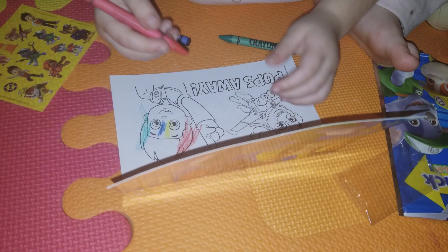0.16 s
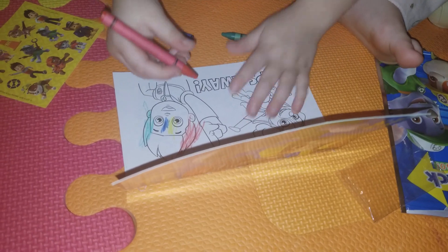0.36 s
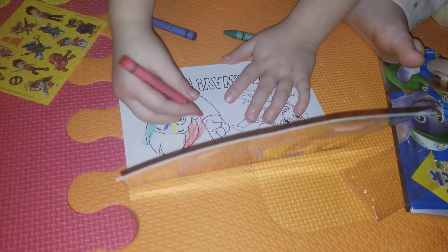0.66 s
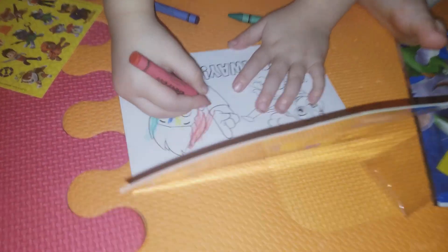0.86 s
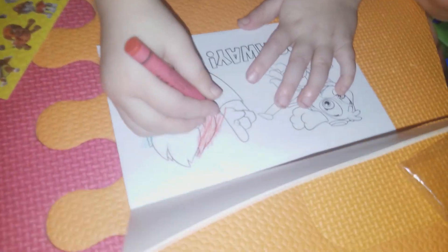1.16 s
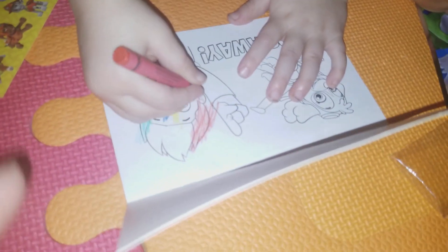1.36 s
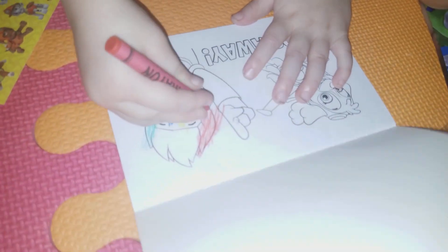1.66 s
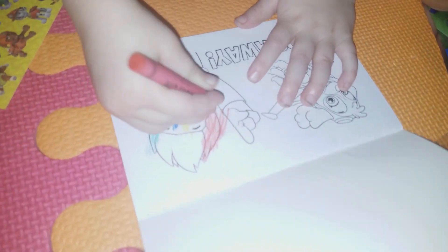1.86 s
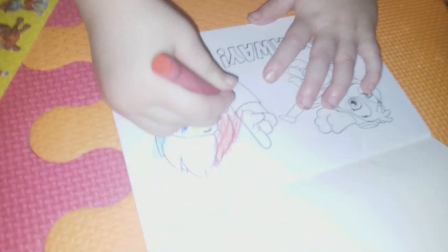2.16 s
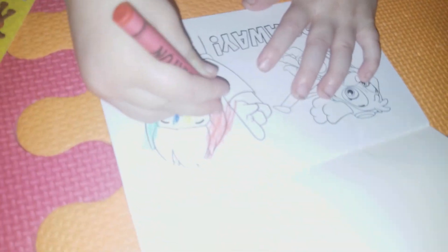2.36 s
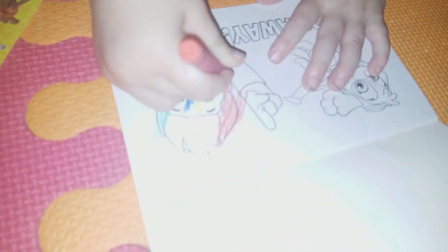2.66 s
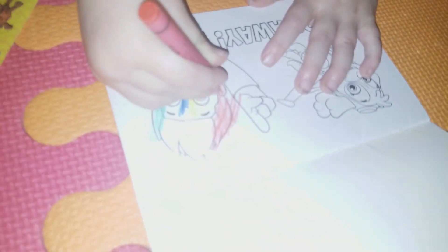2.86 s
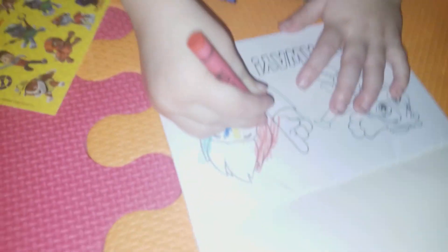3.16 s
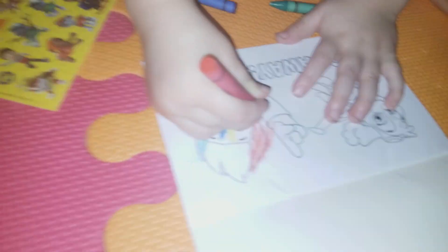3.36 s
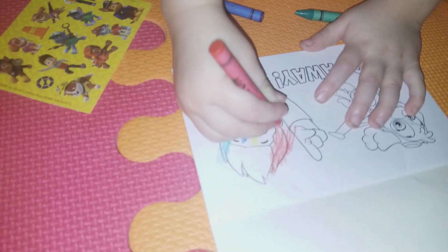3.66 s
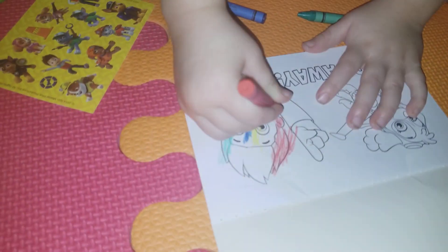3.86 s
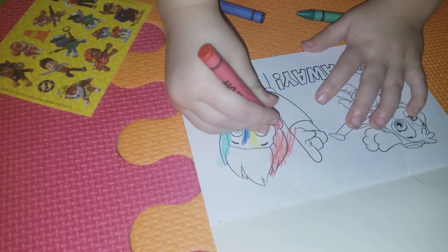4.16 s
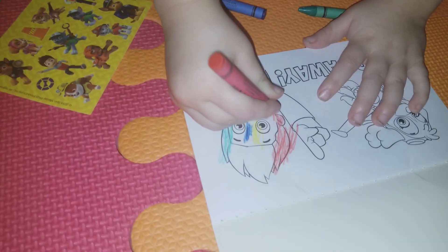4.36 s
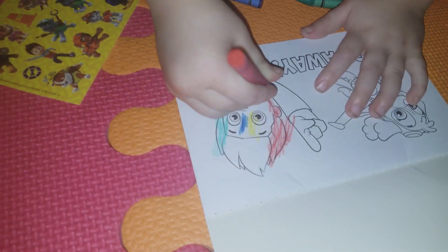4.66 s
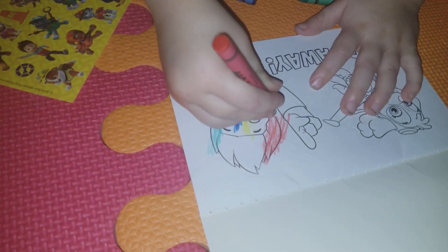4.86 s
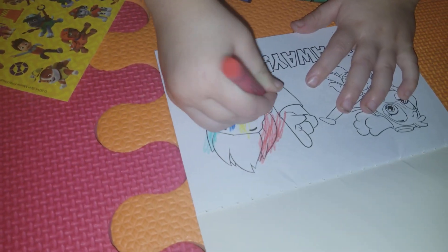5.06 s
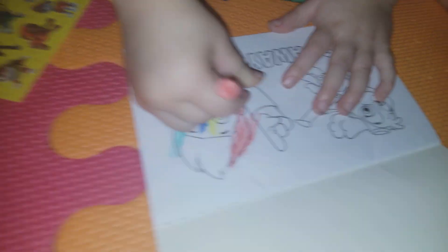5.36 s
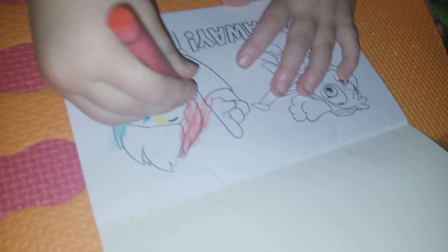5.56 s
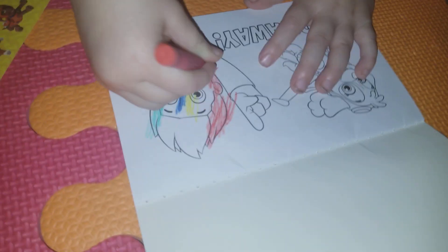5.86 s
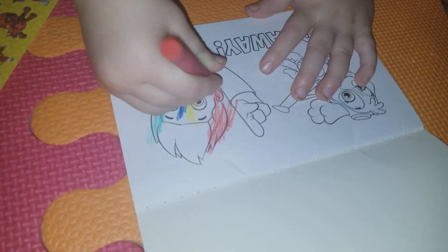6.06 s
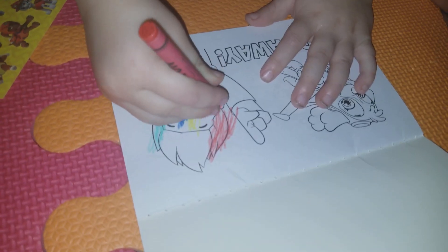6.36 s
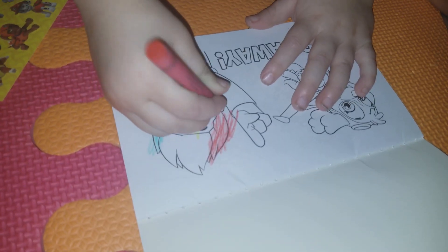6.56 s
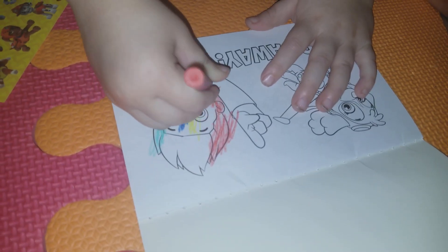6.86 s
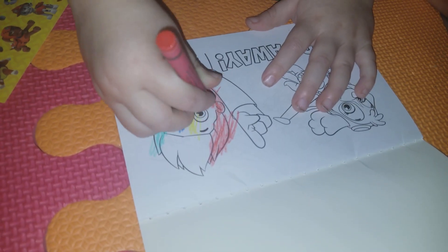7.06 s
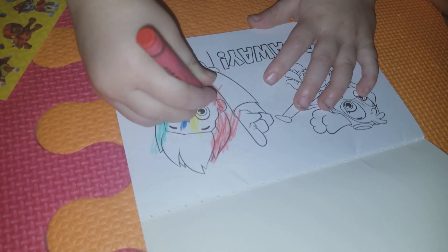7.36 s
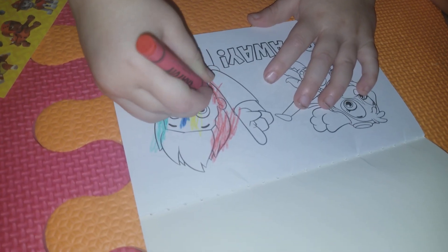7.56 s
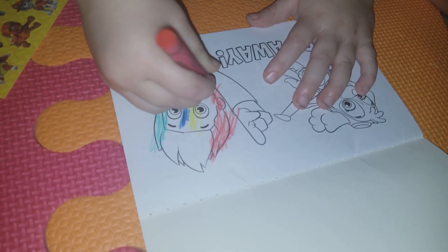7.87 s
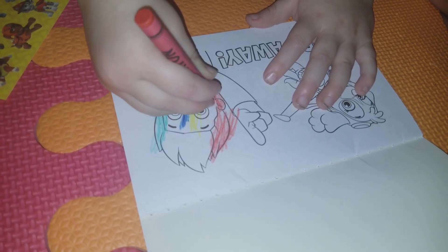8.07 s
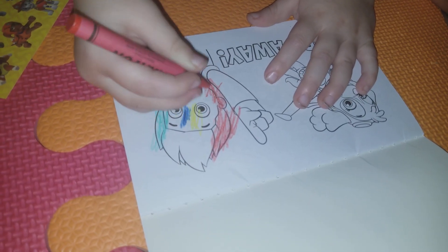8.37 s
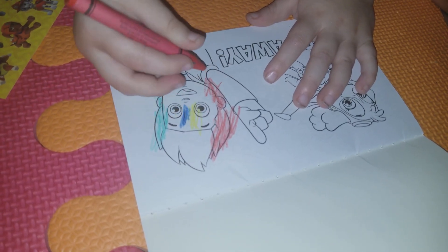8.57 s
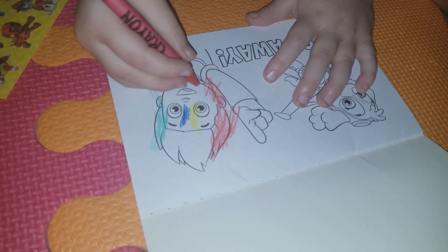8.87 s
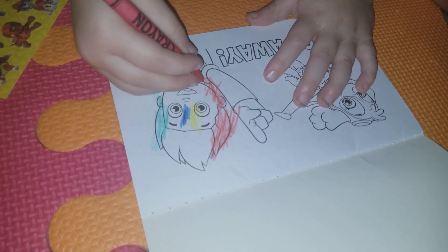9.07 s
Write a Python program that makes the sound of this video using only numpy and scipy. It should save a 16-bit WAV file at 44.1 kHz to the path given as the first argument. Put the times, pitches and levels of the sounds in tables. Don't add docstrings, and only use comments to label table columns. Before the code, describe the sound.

A quiet indoor room, heard very close on a handheld stereo microphone. A low, steady appliance hum and soft airy room noise run throughout, with a thin whine fading over the first two seconds. From 0 to 3.2 s a paper page flaps and rustles, shifting between the sides, with small ticks and dull handling knocks near 0.4, 1.0 and 1.6 s. At about 2.4 s the cover gives a crisp snap, followed at 2.5 s by the loudest hard clack with a low thump and a short fingertip scrape. More taps click around 3.1 to 3.3 s. Then a wax crayon rubs flat paper in short, soft, grainy hisses, mainly to the right, unevenly spaced. Light taps and knocks interrupt around 5.3 to 5.7 s. Strokes continue sparser after 6 s, with faint skin rubs near 7 s, ending in longer, fainter rubbing from 8.3 to 9.2 s.

```python
import sys
import numpy as np
from scipy import signal
from scipy.fft import rfft, irfft, next_fast_len
from scipy.io import wavfile
from scipy.ndimage import uniform_filter1d

SR = 44100
rng = np.random.default_rng(int(sys.argv[2]) if len(sys.argv) > 2 else 0)


def transcribe(signal):
    frames = np.atleast_2d(signal).T
    limited = np.clip(frames, -1, 1)
    pcm = np.round(limited * 32767).astype(np.int16)
    wavfile.write(sys.argv[1], SR, pcm)


def invert_db(x):
    u = np.asarray(x, float) / 20
    return 10 ** u


N = 407032
FAST = next_fast_len(N)
PORT_LAG, MAT_ECHO = 20, 34

# (start [s], length [s], hiss [dB], swell across the stroke [dB], extra sheen [dB])
STROKES = [(3.268, 0.076, -61, -2, 2), (3.48, 0.11, -63, -4, -2), (3.59, 0.083, -59.5, -3, 3),
           (3.669, .18, -60, 11, 1.3), (3.906, .14, -64, -8, 1.5), (4.088, 0.13, -58.5, 4, -2),
           (4.323, 0.23, -58.5, 12, -0.2), (4.661, 0.22, -57, 5.5, 3), (5.031, 0.16, -61, -2, 1.5),
           (5.22, .11, -54, -1, -3), (5.387, 0.15, -61, -5, 2), (5.546, 0.076, -57, -10, 2),
           (5.747, 0.22, -58.5, -7, -0.8), (6.047, .13, -57.5, -6, 0.3), (6.63, .18, -59.5, 0.1, 1.5),
           (6.976, 0.14, -60.5, -4, 2.5), (7.09, 0.099, -65, 0.1, 0.1), (7.599, 0.17, -60.5, 2, 0.5),
           (7.873, .1, -59, -8, 1), (7.956, 0.19, -65, -24, 0.1), (8.324, 0.29, -64, 5, 1.2),
           (8.557, 0.27, -67, 4, 0), (8.802, 0.55, -67.5, 13, -0.5)]
STROKE_ATTACK_S, STROKE_RELEASE_S = 0.083, 0.086
STROKE_BODY_DB, STROKE_GRIT_DB, STROKE_PAN_DB = -4.5, -12, -12.5
FIRM_DB = -55.5
SHEEN_DB, SHEEN_STEEP = -3.5, 1.2
SOFT_EDGE = 1.4
# (time [s], page body [dB])
CREEP = [(3.2, -88), (3.5, -67), (4.3, -66.5), (5.0, -71.5), (5.7, -61), (6.2, -81), (7.0, -70), (7.5, -70),
         (9.23, -86)]
CREEP_HISS_DB = -7
# (start [s], length [s], hiss [dB], page body minus hiss [dB], fine grit minus hiss [dB])
RUSTLES = [(0, 0.29, -77, 14, -3), (0.281, 0.26, -69, 6.5, -1), (0.41, 0.079, -57.5, 1.5, -16),
           (.49, 0.29, -67, 2.5, -11), (0.763, 0.12, -64, 6.5, 3.5), (0.866, 0.16, -65, 5.5, -11),
           (0.983, 0.24, -60, 1.5, -6), (1.276, 0.15, -62.5, 0, -2), (1.4, 0.21, -67, 6.5, -9),
           (1.57, 0.17, -60.5, 3.5, 2.5), (1.745, 0.15, -67.5, 5, -8), (1.862, 0.12, -66.5, 4.5, -7),
           (1.942, .12, -60.5, 5.5, -2), (2.033, .14, -61, 9, -5.5), (2.152, .22, -66.5, 7, -6),
           (2.378, 0.22, -59, 8, -5), (2.52, 0.22, -55, 7, 0), (2.796, 0.063, -66, 5, -8),
           (2.874, 0.11, -63.5, 4.5, -6), (2.949, 0.21, -57.5, 7.5, 0), (3.188, 0.097, -64, 16, -6),
           (3.197, .055, -58, 4, 12)]
RUSTLE_ATTACK_S, RUSTLE_RELEASE_S, RUSTLE_SWELL_DB = 0.018, 0.045, 1
# (time [s], left minus right [dB])
PAGE_SIDE = [(0, -21), (.45, -6), (1.05, 2.5), (1.33, -4), (1.6, -5.5), (2.1, 5.5), (2.5, -8), (2.97, -18),
             (3.25, -1)]
# (frequency [Hz], level [dB per Hz])
PAGE_BODY = [
    [(600, -0.5), (1100, 1), (1700, -1), (2400, -1), (3200, 0.5), (4700, -9), (5600, -25.5)],
    [(600, -10.5), (1100, 0), (1750, 3), (2400, -7.5), (2900, -1), (3300, -1.5), (4700, -13.5),
     (5600, -31.5)],
]
RUSTLE_HISS = [(3200, -6), (4600, 3.5), (6000, 1.5), (7300, 3), (8300, -6), (10000, 0.5), (11600, -12),
               (12300, -35.5)]
STROKE_HISS = [(3000, -10.5), (4200, -0.3), (4700, 0), (5500, 0.7), (6300, 0.5), (7000, -1), (8500, -15.5),
               (10500, -16), (11500, -41)]
# (frequency [Hz], level [dB per Hz])
SHEEN = [(6300, -30), (7000, 0), (7600, -0.5), (8300, -8), (9600, -1), (10200, -8), (11500, -9),
         (12200, -30)]
# (frequency [Hz], level [dB per Hz])
GRIT = [(9000, -30.5), (10700, -0.5), (12000, 0.5), (13000, -6), (14800, -2), (15800, -5.5), (16500, -25.5)]
# (frequency [Hz], level [dB])
LEFT_PORT = [(800, -9.5), (3000, -3), (5200, -9.5), (6000, -30.5), (12500, -20), (14500, -3.5)]
# (start [s], length [s], level [dB], resonance [Hz], left minus right [dB])
RUBS = [(.432, .014, -54, 4500, -10), (.432, .016, -54, 2200, -10), (.455, .03, -59, 3500, -6),
        (1.665, .05, -60, 12000, -12), (.8, .16, -66, 3800, -5), (.99, .19, -61, 3700, -4),
        (2.04, .12, -57, 2500, -2), (1.96, .16, -64, 4400, -2), (5.694, .014, -56, 2600, -10),
        (7.0, .08, -63, 1750, -4), (6.68, .1, -68, 1700, -4), (2.54, .07, -47, 4000, -14),
        (4.42, .1, -66, 1600, -4), (5.772, .03, -60, 4500, -10), (6.85, .3, -74, 1400, -3),
        (7.15, .5, -72, 1400, -3)]
RUB_WIDTH, RUB_GRAIN_DB = .45, 2.5
RUB_TAPER = .7

# (time [s], peak [dB], ring [Hz], crack minus peak [dB], fall by 60 dB [ms])
CASE_TICKS = [(0.9807, -36, 3350, -10, 6), (0.9806, -25, 12500, -12, 1.6), (1.6585, -38, 1260, -12, 6.4),
              (1.7203, -31, 1500, -20, 2.4), (1.7204, -35, 3300, -20, 3.5), (1.7203, -34, 11500, -14, 1.6),
              (1.576, -46, 4900, -8, 5), (.4264, -41, 4800, -6, 4), (5.774, -45, 4800, -3, 5),
              (1.6175, -44, 4700, -14, 4), (1.657, -42, 5200, -6, 4), (2.277, -41, 1500, -6, 1.5),
              (2.2832, -33, 1700, -4, 2), (2.5326, -10, 3700, -18, 1.4), (2.5393, -16, 1500, -11.5, 1.3),
              (2.5562, -28, 2200, -12, 1.8), (2.966, -37, 2050, -3, 4), (3.107, -43, 3420, 0, 2.6),
              (3.2138, -32, 3600, -8, 3), (3.2195, -23, 3300, -6, 1.7), (3.2219, -24, 3700, -8, 2.4),
              (3.228, -32, 2600, -6, 3), (3.252, -40, 1500, -20, 4), (3.5317, -32, 2620, -28.5, 1.1),
              (3.538, -44, 2410, -12, 2.5), (5.2844, -33, 1700, -20, 3), (5.2844, -37, 3800, -8, 2),
              (5.3515, -26, 1600, -8, 1.2), (5.3516, -37, 7000, -20, 1.5), (5.3514, -29.5, 3340, -6, 4),
              (5.3517, -34, 5100, -20, 3.5), (5.3514, -28.5, 11500, -20, 1), (5.387, -50, 2000, -13, 1.3),
              (5.5502, -30, 1100, -3, 2), (5.5508, -31, 3300, -6, 4), (5.559, -48, 4200, -8, 2),
              (5.5828, -25, 1500, -22, 2), (5.5829, -32, 2900, -20, 3), (5.5828, -31, 11800, -20, 1.5),
              (5.6976, -41, 1330, -9, 4)]
BOOK_TICKS = [(.4262, -36, 1980, -18, 6.4), (0.9721, -40, 2300, 0, 3), (.9843, -49, 3300, -9, 1.7),
              (1.576, -40.5, 2860, -9, 4.5), (1.6164, -38.5, 1500, -2, 6), (1.6635, -42, 900, -19, 4),
              (2.0118, -36, 1500, -10, 5), (2.0155, -38, 1300, -18, 8), (2.291, -44, 1500, -14, 4),
              (2.406, -45, 2010, -18, 4), (2.4426, -33, 1800, -18, 3.6), (2.5232, -5.5, 2240, -28, 3.6),
              (2.5237, -20, 1350, -28, 3), (2.1903, -44, 1190, -18, 6), (2.26, -46, 1750, -18, 5),
              (2.476, -42, 1400, -18, 5), (2.72, -65, 5050, 23, 1.7), (3.119, -41.5, 3500, 3, 1.8),
              (3.256, -45, 3000, 0, 2.2), (3.2235, -36, 1100, -20, 8), (3.228, -37, 1150, -20, 8),
              (3.214, -41, 1300, -20, 5), (4.163, -44, 800, -8, 9), (6.9198, -46.5, 1750, -23.5, 8.2)]
# (time [s], peak [dB], ring [Hz], fall by 60 dB [ms])
LEFT_TICKS = [(.9714, -45, 1700, 9), (.9806, -41, 2100, 5), (.9836, -43, 2400, 6), (2.5231, -29, 2240, 6),
              (2.5324, -29, 650, 22), (3.0945, -45, 600, 14), (3.2132, -36, 2800, 6),
              (3.2194, -37, 3000, 4), (3.2217, -33, 2400, 6), (3.228, -37, 2200, 6), (5.3512, -43, 2100, 6),
              (5.5511, -37, 750, 14)]
# (time [s], peak [dB], ring [Hz], left minus right [dB], fall by 60 dB [ms])
SNAP = [
    (2.3661, -11.5, 14300, -5.5, 2.2),
    (2.3663, -17, 8800, -8, 1.2),
    (2.3662, -16, 6000, -8, 1.2),
    (2.3665, -17.5, 1750, -25, 1.8),
    (2.3667, -13.5, 3300, -30.5, 2.8),
    (2.3665, -24, 3900, -20, 1.5),
    (2.3663, -20, 7100, -8, 2),
    (2.3659, -17, 2980, 25, 3.6),
]
CASE_TICK_PAN_DB, BOOK_TICK_PAN_DB, LEFT_TICK_PAN_DB = -41.5, -13, 25
LEFT_CRACK_DB, SNAP_CRACK_DB = -14, -8
# (frequency [Hz], level [dB per Hz])
BOOK_CRACK = [(600, -24), (1500, 4), (4500, -5), (6500, 0.5), (8500, -6.5), (11000, -3.5), (13500, -0.5),
              (15500, -12), (16500, -42.5)]
CASE_CRACK = [(600, -10.5), (3400, -1), (5000, -4), (6500, -17), (9000, -12), (11500, 0), (14000, -9),
              (16500, -43)]
# (time [s], peak [dB], first pitch [Hz], fall by 60 dB [ms], pitch sag)
CASE_KNOCKS = [(.9718, -30.5, 1650, 7, 2.4), (1.7209, -38, 442, 6, 1), (2.2838, -38, 283, 14, .11),
               (2.524, -15, 590, 5.5, 0.19), (2.966, -30.5, 470, 8.1, 0.51), (3.0925, -32, 140, 9, .05),
               (3.2255, -31, 290, 18, .14), (3.2316, -28, 480, 14, .1), (3.2563, -30, 620, 8, .05),
               (3.527, -39.5, 62, 300, .02), (4.163, -32.5, 172, 35, .5), (5.2818, -42, 700, 6, .2),
               (5.2841, -30, 2500, 17, 1.7), (5.431, -45, 600, 8, 0.45), (5.3519, -34, 405, 6, 0.86),
               (5.5507, -23, 2000, 20, 1.9), (5.556, -38, 75, 89, .13), (5.5834, -36, 540, 14, 1),
               (5.635, -39.5, 196, 22, .14), (5.698, -36, 397, 7.1, 0.36)]
# (time [s], peak [dB], pitch [Hz], left minus right [dB], fall by 60 dB [ms])
BOOK_KNOCKS = [(0.428, -41.5, 110, 3, 38), (.939, -40.5, 300, -10, 8.2), (1.578, -41, 910, -12, 20),
               (1.618, -34, 425, 2, 23), (2.367, -37, 450, 9, 14), (2.5328, -11.5, 374, -18, 17),
               (2.5382, -17.5, 560, -14, 8.6), (2.556, -26, 448, 1, 14), (3.0948, -25, 230, -20, 15),
               (3.0983, -36, 590, 20, 26), (3.2553, -35, 600, -15, 4), (5.5511, -23, 400, -18, 8)]
CASE_KNOCK_PAN_DB, BOOK_SAG = -18, .05
CASE_RISE, BOOK_RISE, SNAP_RISE, KNOCK_RISE, BOOK_KNOCK_RISE = 0.44, .8, 0.35, 0.37, .3
# (time [s], peak [dB])
THUDS = [(.43, -65), (0.961, -41), (1.15, -58), (1.61, -43), (2.532, -30.5), (3.08, -37), (4.152, -38),
         (5.061, -58.5), (5.271, -41), (5.549, -32), (5.72, -45)]
# (start [s], length [s], level [dB], left minus right [dB])
SCRAPES = [(.4255, .004, -47, -20), (.433, .012, -50, -20), (.412, .006, -58, -12), (0.466, 0.012, -54, -9),
           (7.02, 0.055, -68, -5), (0.982, 0.0061, -49, -26), (1.6, 0.068, -56.5, -33),
           (2.043, 0.056, -52.5, -5), (2.089, 0.062, -56, -3), (2.519, 0.105, -41, -18.5),
           (3.204, 0.033, -40, -12), (5.695, 0.03, -60.5, -14), (5.734, 0.036, -65.5, -13)]

# (frequency [Hz], level [dB rms])
HUM = [
    (120, -58.5),
    (240, -70),
]
# (time [s], level [dB])
HUM_SWELL = [(0.0, -67.5), (2.6, -60), (9.23, -61.5)]
# (time [s], level [dB])
WHINE = [(0, -66.5), (1.5, -71), (2.3, -78), (4.5, -76), (5.5, -78), (9.23, -81)]
WHINE_HZ = 1093

# (frequency [Hz], level [dB per Hz])
AIR_LOW = [(15, -43.5), (25, -15.5), (65, -3.5), (118, 0), (141, -5.5), (167, -3.5), (237, -9), (285, -26),
           (362, -1), (600, -30), (780, -62), (1320, -120)]
AIR_LOW_DB = -61
# (frequency [Hz], level [dB per Hz])
AIR_LEFT = [
    [(480, -110), (600, -97.5), (780, -92.5), (950, -99), (1100, -95), (1400, -102), (1800, -107),
     (2200, -95.5), (2650, -107), (3100, -99), (3600, -110), (7000, -120), (14500, -114), (16500, -116)],
    [(480, -110), (600, -104), (780, -99), (1000, -107), (1200, -106), (1550, -95.5), (1900, -100),
     (2450, -111), (2800, -97.5), (3500, -108), (4500, -114), (7000, -120), (14500, -116), (16500, -117)],
]
AIR_RIGHT = [
    [(480, -110), (600, -112), (780, -92.5), (1100, -94), (1400, -100), (1800, -92.5), (2650, -101),
     (3100, -101), (4000, -105), (4600, -101), (7000, -107), (8200, -115), (12000, -116), (16500, -117)],
    [(480, -110), (600, -110), (800, -95), (1050, -92.5), (1300, -99), (1700, -100), (2100, -104),
     (2500, -111), (2750, -101), (3300, -101), (4500, -106), (6500, -108), (8000, -117), (10000, -118),
     (13000, -118), (16500, -119)],
]
# (time [s], share of the later colour [0-1])
TILT = [(0, 0), (1.3, .03), (1.9, .8), (3.4, .98), (9.23, .99)]
# (frequency [Hz], likeness [0-1])
AIR_SHARED = [(60, 0.23), (200, 1), (1000, 0.56), (4000, 0.173), (12000, 0.087)]
# (frequency [Hz], width [Hz], level [dB rms])
AIR_MODES = [(45.7, 9, -71), (221.7, 26, -63), (330, 19, -68.5), (450, 47, -76), (540, 25, -79),
             (738, 18, -77)]


def friction():
    stroke, sheen = stroke_pushes()
    hiss, body, grit = rustle_pushes()
    creep = invert_db(curves(CREEP)[0])
    layers = [
        (RUSTLE_HISS, hiss),
        (STROKE_HISS, stroke + creep * invert_db(CREEP_HISS_DB)),
        (SHEEN, sheen),
        (PAGE_BODY[0], body),
        (PAGE_BODY[1], stroke * invert_db(STROKE_BODY_DB) + creep),
        (GRIT, grit + stroke ** 2 * invert_db(STROKE_GRIT_DB - FIRM_DB)),
    ]
    side = invert_db(curves(PAGE_SIDE + [(STROKES[1][0], STROKE_PAN_DB)])[0])
    out = np.zeros((2, N))
    judder = walk(70)
    for table, pressure in layers:
        catch = invert_db(2 * rng.exponential(size=N) + .8 * walk(90) + 1.35 * judder)
        direct = colour(rng.standard_normal(N) * catch, table) * pressure
        other = colour(rng.standard_normal(N) * catch, table) * pressure
        left = np.roll(.5 * direct + 1.7 * other, PORT_LAG) * side
        out += [left, direct]
    out[0] = shade(rfft(out[0], FAST), LEFT_PORT)
    out[1] = off_mat(out[1], .35)
    return out


def stroke_pushes():
    pushes = [(s, length, db, swell_db) for s, length, db, swell_db, _ in STROKES]
    bright = [(s, length, db - FIRM_DB + extra_db, swell_db) for s, length, db, swell_db, extra_db in STROKES]
    stroke = gestures(pushes, STROKE_ATTACK_S, STROKE_RELEASE_S)
    sheen = gestures(bright, STROKE_ATTACK_S, STROKE_RELEASE_S) ** SHEEN_STEEP
    return stroke, sheen * invert_db(FIRM_DB + SHEEN_DB)


def rustle_pushes():
    hiss, body, grit = [], [], []
    for s, length, db, body_db, grit_db in RUSTLES:
        hiss.append((s, length, db, RUSTLE_SWELL_DB))
        body.append((s, length, db + body_db, RUSTLE_SWELL_DB))
        grit.append((s, length, db + grit_db, RUSTLE_SWELL_DB))
    return [gestures(rows, RUSTLE_ATTACK_S, RUSTLE_RELEASE_S) for rows in (hiss, body, grit)]


def rubs():
    out = np.zeros((2, N))
    grains = rng.standard_normal(N) * invert_db(RUB_GRAIN_DB * walk(60))
    for s, length, db, hz, pan_db in RUBS:
        i, n = int(s * SR), int(length * SR)
        edges = [hz / (1 + RUB_WIDTH / 2), hz * (1 + RUB_WIDTH / 2)]
        sos = signal.butter(2, edges, "band", fs=SR, output="sos")
        rub = level(signal.sosfilt(sos, grains[i:i + n]), db)
        add(out, rub * signal.windows.tukey(n, RUB_TAPER), s, pan_db)
    return out


def ticks():
    out = np.zeros((2, N))
    white = rng.standard_normal(N)
    book, case = colour(white, BOOK_CRACK), colour(white, CASE_CRACK)
    events = [(*r, CASE_TICK_PAN_DB, case, CASE_RISE) for r in CASE_TICKS]
    events += [(*r, BOOK_TICK_PAN_DB, book, BOOK_RISE) for r in BOOK_TICKS]
    events += [(s, db, hz, SNAP_CRACK_DB, t60_ms, pan_db, book, SNAP_RISE)
               for s, db, hz, pan_db, t60_ms in SNAP]
    events += [(s, db, hz, LEFT_CRACK_DB, t60_ms, LEFT_TICK_PAN_DB, book, BOOK_RISE)
               for s, db, hz, t60_ms in LEFT_TICKS]
    for s, db, hz, crack_db, t60_ms, pan_db, crack, rise in events:
        t60_ms = max(t60_ms, .5)
        tone = ring(hz, t60_ms, rise, sag=0.0085)
        i, t = int(s * SR), np.arange(len(tone)) / SR
        burst = crack[i:i + len(tone)] * invert_db(-60000 * t / t60_ms)
        burst = burst / np.abs(burst).max()
        add(out, invert_db(db) * (invert_db(crack_db) * burst - tone), s, pan_db)
    return out


def knocks():
    out = np.zeros((2, N))
    events = [(s, db, hz, CASE_KNOCK_PAN_DB, t60_ms, sag, KNOCK_RISE, 1)
              for s, db, hz, t60_ms, sag in CASE_KNOCKS]
    events += [(*r, BOOK_SAG, BOOK_KNOCK_RISE, -1) for r in BOOK_KNOCKS]
    for s, db, hz, pan_db, t60_ms, sag, rise, push in events:
        blow = ring(hz, max(t60_ms, 2), rise, max(sag, .01))
        add(out, push * invert_db(db) * blow, s, pan_db)
    return out


def thuds():
    out = np.zeros((2, N))
    for s, db in THUDS:
        add(out, invert_db(db) * ring(73.0, t60_ms=116, rise=0.216, sag=0.102), s, -14)
    return out


def scrapes():
    out = np.zeros((2, N))
    slips = rng.standard_normal(N) * invert_db(2.0 * rng.exponential(size=N))
    slips = colour(slips, [(200, -23.0), (700, 0.5), (2500, 2.0), (5000, 0.0), (8500, -14.0),
                           (14000, -10), (16500, -91)])
    slips = off_mat(slips, 0.1)
    for s, length, db, pan_db in SCRAPES:
        i, n = int(s * SR), int(length * SR)
        shape = signal.windows.tukey(n, .3) * invert_db(np.linspace(3, -5, n))
        add(out, invert_db(db) * slips[i:i + n] * shape, s, pan_db)
    return out


def appliance():
    t = np.arange(N) / SR
    hum = np.zeros(N)
    for hz, db in HUM:
        hum += invert_db(db + 1.0 * walk(8)) * np.sin(2 * np.pi * hz * t + .2 * walk(5))
    third_db = curves(HUM_SWELL)[0] - 3.5 + 2.2 * walk(8.3)
    hum += invert_db(third_db) * np.sin(2 * np.pi * 3 * HUM[0][0] * t + 0.28 * walk(5.7))
    whine = invert_db(curves(WHINE)[0]) * np.sin(2 * np.pi * WHINE_HZ * t + 0.5 * walk(6.7))
    return np.sqrt(2) * (ports(hum, -1.5) + ports(whine, -15.5))


def air():
    alike = np.clip(on_hz(AIR_SHARED), 0, 1)
    later = np.clip(curves(TILT)[0], 0, 1)
    shared = rng.standard_normal(N)
    low, high = [], []
    for tables, lag in ((AIR_LEFT, PORT_LAG), (AIR_RIGHT, 0)):
        common = rfft(np.roll(shared, lag), FAST)
        own = rfft(rng.standard_normal(N), FAST)
        mix = np.sqrt(alike) * common + np.sqrt(1 - alike) * own
        low.append(shade(mix, AIR_LOW))
        first, second = (shade(mix, table) * np.sqrt(SR / 2) for table in tables)
        high.append((1 - later) * first + later * second)
    swell_db = curves(HUM_SWELL)[0]
    swell = invert_db(0.54 * (swell_db - swell_db.mean()))
    modes = sum(band(hz, width) * invert_db(db + 1.2 * walk(3)) for hz, width, db in AIR_MODES)
    return swell * (level(np.array(low), AIR_LOW_DB) + ports(modes, -1.2)) + np.array(high)


def gestures(rows, attack_s, release_s):
    out, t = np.zeros(N), np.arange(N) / SR
    for s, length, db, swell_db in rows:
        on = slice(int(s * SR), int((s + length) * SR))
        x = t[on] - s
        edge = np.clip(np.minimum(x / attack_s, (length - x) / release_s), 0, 1)
        out[on] += np.sin(edge * np.pi / 2) ** SOFT_EDGE * invert_db(db + swell_db * (x / length - .5))
    return out


def ring(hz, t60_ms, rise, sag):
    t = np.arange(int(t60_ms * SR / 1000) + 40) / SR
    turns = np.log1p(sag * hz * t) / sag
    push = np.sin(np.minimum(turns / rise, 1) * np.pi / 2) ** 2
    x = np.sin(2 * np.pi * turns) * invert_db(-60000 * t / t60_ms) * push
    return x / np.abs(x).max()


def off_mat(x, share):
    return x - share * np.roll(uniform_filter1d(x, size=5), MAT_ECHO)


def ports(x, pan_db):
    share = invert_db(pan_db)
    return np.array([np.roll(x, PORT_LAG) * share, x]) * 2 / (1 + share)


def add(out, x, s, pan_db):
    both = ports(np.pad(x, (0, PORT_LAG)), pan_db)
    i = int(s * SR)
    out[:, i:i + both.shape[1]] += both


def level(x, db):
    return x * invert_db(db) / np.sqrt(np.mean(x ** 2))


def on_hz(table):
    hz, value = np.transpose(table)
    return np.interp(np.log(np.fft.rfftfreq(FAST, 1 / SR) + 1), np.log(hz), value)


def shade(spectrum, table):
    return irfft(spectrum * invert_db(on_hz(table)), FAST)[:N]


def colour(x, table):
    return level(shade(rfft(x, FAST), table), 0)


def band(hz, width):
    b, a = signal.iirpeak(hz, hz / width, SR)
    return level(signal.lfilter(b, a, rng.standard_normal(N)), 0)


def curves(table):
    s, *columns = np.transpose(table)
    return [np.interp(np.arange(N) / SR, s, c) for c in columns]


def walk(rate):
    k = int(SR / rate)
    steps = np.repeat(rng.standard_normal(N // k + 1), k)
    return 1.5 * uniform_filter1d(uniform_filter1d(steps, k), k)[:N]


def scene():
    fingers = ticks() + knocks() + thuds() + scrapes()
    return friction() + rubs() + fingers + appliance() + air()


def band_limit(x):
    return signal.sosfilt(signal.butter(12, 17000, fs=SR, output="sos"), x)


def record(dry):
    wet = signal.sosfilt(signal.butter(2, 46, "high", fs=SR, output="sos"), dry)
    wet = signal.sosfilt(signal.ellip(6, .3, 50, 16550, fs=SR, output="sos"), wet)
    return band_limit(wet)


dry = scene()
out = record(dry)
transcribe(out)
```